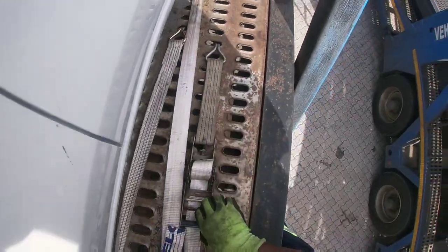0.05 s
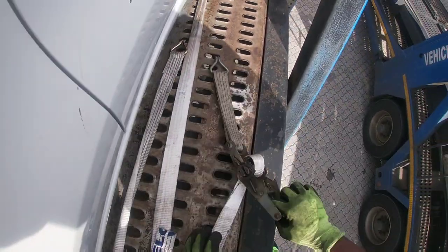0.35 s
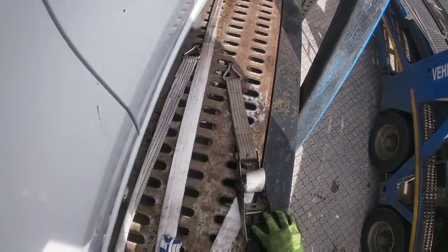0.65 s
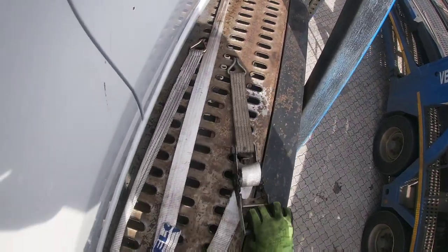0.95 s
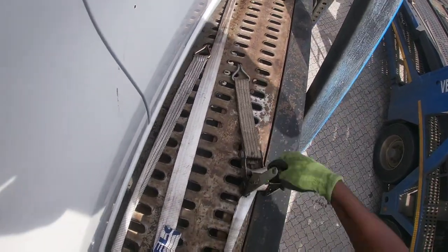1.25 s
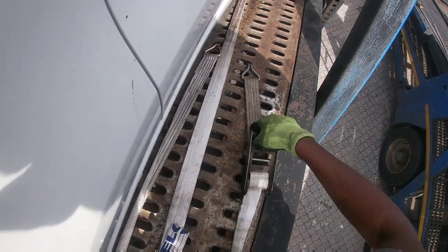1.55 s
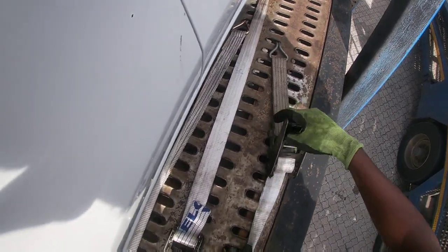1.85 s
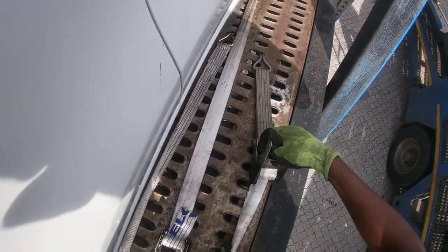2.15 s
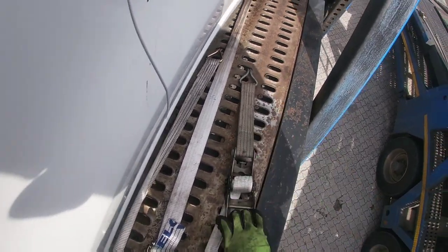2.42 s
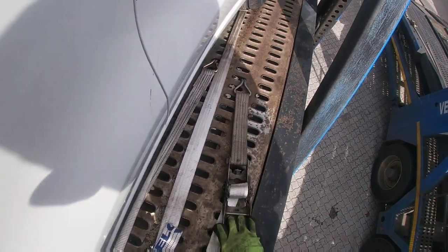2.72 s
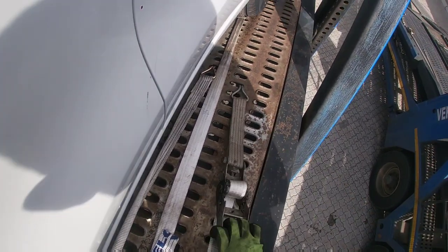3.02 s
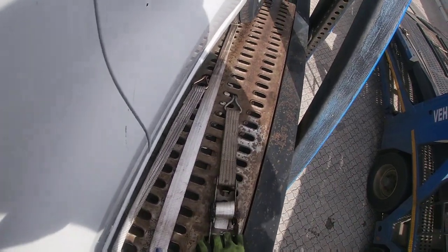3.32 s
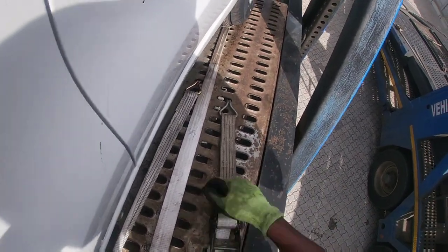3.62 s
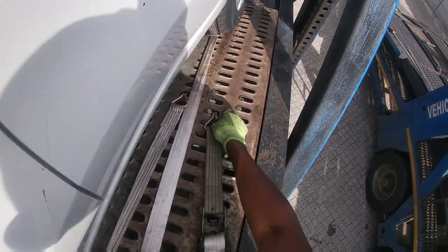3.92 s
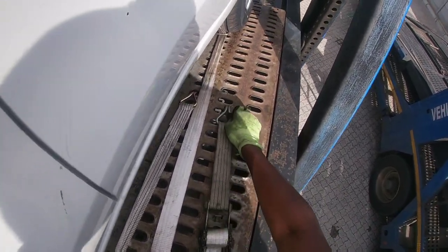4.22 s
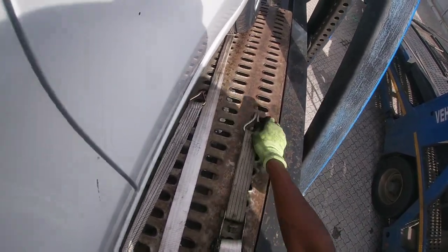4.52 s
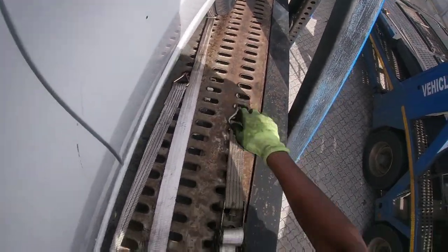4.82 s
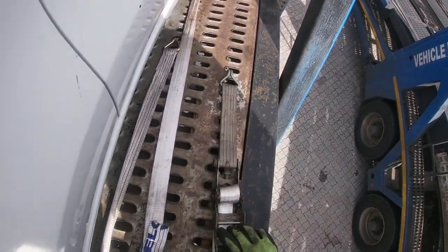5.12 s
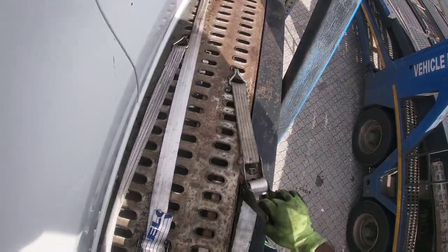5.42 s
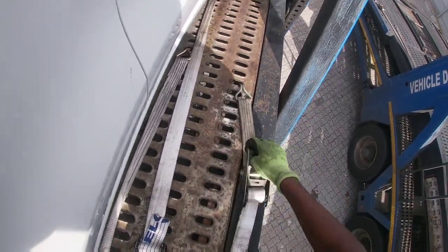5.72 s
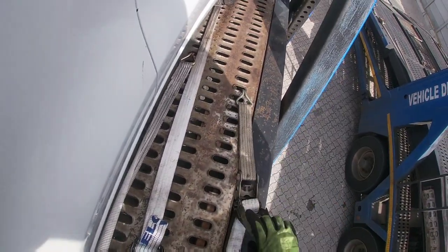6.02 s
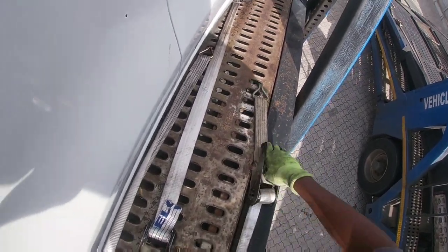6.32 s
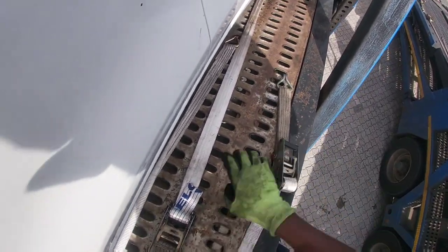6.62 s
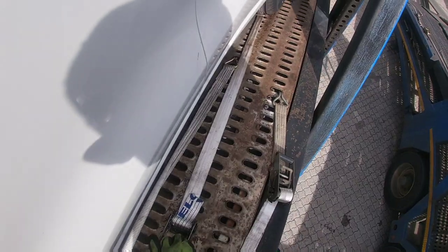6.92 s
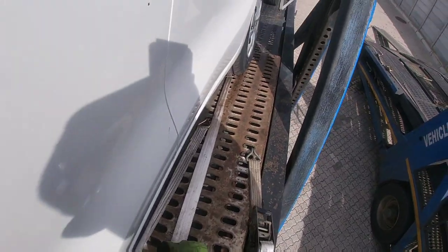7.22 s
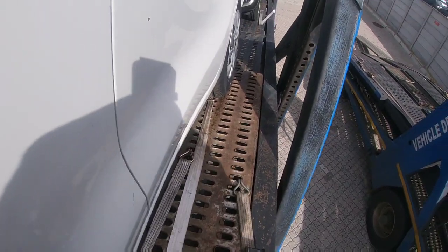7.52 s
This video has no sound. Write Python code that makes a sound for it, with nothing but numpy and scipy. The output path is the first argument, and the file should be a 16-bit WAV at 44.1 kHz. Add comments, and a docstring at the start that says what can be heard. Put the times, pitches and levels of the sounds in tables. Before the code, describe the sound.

A tie-down strap's hook and ratchet knock irregularly on a perforated steel trailer deck, making it clang and ring. Loose ratchet parts clink while the webbing rasps over the steel and faintly swishes against a glove. The knocks come in clusters throughout, with a few dull bumps on the microphone near the end. It is outdoors, heard at arm's length from a body-worn microphone with low rumble, gusts and a faint far engine fading early.

```python
"""A strap's hook and ratchet knock a trailer's perforated steel deck into ringing, outdoors.
A gloved hand drags the strap: loose ratchet parts clink, steel prongs ring, webbing rasps over
the deck and swishes on the glove. A body-worn mono camera hears it from arm's length, with
low rumble, dull bumps on its housing, wind, yard noise and a far engine slowing."""
import sys
import numpy as np
from scipy import signal
from scipy.fft import rfft, irfft
from scipy.io import wavfile
from scipy.ndimage import uniform_filter1d

SR = 44100
rng = np.random.default_rng(int(sys.argv[2]) if len(sys.argv) > 2 else 0)


def unload_wav(signal):
    """Save mono or channel-first audio to the path in sys.argv[1] as 16-bit WAV at rate SR, clipped to [-1, 1]."""
    wavfile.write(
        sys.argv[1],
        SR,
        np.round(np.clip(np.atleast_2d(signal).T, -1, 1) * 32767).astype(np.int16),
    )


N = 341775
T = np.arange(SR) / SR  # one second, the life of a blow
SCENE_T = np.arange(N) / SR
TOP_HZ = 15300

# hardware landing on the deck: start_s, clang_db, boom_db, hook_db, hook_hz, clang_t60_s
KNOCKS = [(0.022, -16.5, -48, -22.5, 2460, 0.073), (0.154, -16, -38, -24.5, 3140, 0.058),
          (0.328, -24.5, -37, -38, 5700, 0.43), (0.352, -17.5, -49, -24.5, 3400, 0.16),
          (0.366, -17, -35.5, -29, 2500, 0.22), (0.436, -22, -25.5, -33.5, 2750, .29),
          (0.483, -20, -27.5, -33.5, 4830, 0.26), (0.533, -26, -26.5, -36, 4810, 0.3),
          (0.614, -20.5, -27.5, -35, 2580, 0.12), (0.68, -17, -22, -24, 3070, 0.088),
          (0.999, -31, -43, -44, 3300, 0.61), (1.038, -20, -29, -24, 2720, 0.2),
          (1.08, -26, -29.5, -41, 2070, 0.86), (1.152, -27.5, -30, -40.5, 2300, 0.93),
          (1.221, -32.5, -30, -42, 4200, 0.6), (1.492, -35.5, -49, -41.5, 6160, 0.78),
          (1.538, -22.5, -43, -17.5, 4160, 0.2), (1.658, -13.5, -28.5, -19, 3030, 0.13),
          (1.698, -26.5, -25, -29.5, 3470, 0.27), (2.08, -25.5, -41.5, -41, 2390, 0.054),
          (2.393, -14.5, -27.5, -12.5, 2620, 0.081), (2.494, -16.5, -18.5, -22.5, 6160, 0.18),
          (2.522, -29, -25.5, -34, 2380, .57), (2.604, -26.5, -28, -38, 3440, .65),
          (2.676, -20.5, -39, -30, 5000, 0.36), (2.689, -24.5, -23, -37.5, 3360, 0.51),
          (2.888, -14.5, -17, -19, 3040, 0.18), (2.918, -27, -18.5, -26.5, 2120, 0.18),
          (3.461, -8.5, -17, -12, 2730, 0.073), (3.56, -24, -31.5, -43, 2500, .19),
          (3.646, -33.5, -44, -40.5, 3230, 0.69), (3.663, -24.5, -48, -31.5, 2780, 0.23),
          (4.026, -29.5, -47, -47, 2630, .14), (4.168, -19.5, -31, -22, 3280, 0.25),
          (4.299, -28, -26, -32.5, 4500, 0.36), (4.375, -30.5, -31, -42.5, 2520, 1),
          (4.426, -28.5, -35, -43, 4300, 0.57), (4.462, -21.5, -31, -20, 2640, 0.13),
          (4.614, -18, -42, -26.5, 2700, 0.31), (4.712, -15.5, -25, -18.5, 2650, 0.29),
          (4.784, -30, -24.5, -41, 2770, 0.5), (4.861, -21.5, -35, -38, 2230, 0.24),
          (5.343, -23, -32, -28.5, 2550, 0.29), (5.466, -28, -26, -39, 2650, 0.18),
          (5.521, -15.5, -55, -16, 4480, 0.16), (5.616, -17.5, -26, -21, 2730, .05),
          (5.641, -31, -26, -19.5, 2600, 0.22), (5.673, -16.5, -30, -20, 6000, 0.15),
          (5.738, -32, -32, -14.5, 2600, 0.025), (5.885, -21.5, -45, -21.5, 4120, 0.25),
          (5.931, -45, -27, -20, 4720, 0.51), (6.037, -22, -24.5, -13, 3010, 0.15),
          (6.503, -15.5, -29, -28, 2820, 0.11), (6.925, -25.5, -46, -21, 4620, 0.17),
          (7.158, -26, -40, -39, 2200, 0.098), (7.353, -35, -52, -40.5, 2270, 0.48),
          (7.447, -12, -18, -14, 4300, 0.11), (7.47, -19, -44, -18.5, 4300, 0.42)]
# spectra of deck, frame and hook: freq_hz, gain_db
CLANG_SPECTRUM = [(300, -51), (450, -14.5), (690, -11.5), (840, 3), (1000, 5), (1150, 0.5), (1320, -5.5),
                  (1900, -11.5), (2600, -18), (3500, -31.5), (6100, -59), (10000, -84)]
BOOM_SPECTRUM = [(80, -24.5), (135, -7), (200, 4), (300, 3.5), (450, -1), (640, 0), (850, -2), (1100, -37),
                 (1450, -38), (2600, -81.5)]
HOOK_SPECTRUM = [(800, -41.5), (1430, -8.5), (1900, -5.5), (2570, 1.5), (3460, 4.5), (4600, 0),
                 (6100, -4.5), (7900, -15), (10200, -24.5), (13500, -41), (14800, -45.5)]
# strong resonances of deck and hook: freq_hz, width_hz, gain_db
RESONANCES = [(597.6, 7.3, 7.5), (910, 64, -1.5), (902, 79, 0), (1089, 13.3, 5), (1161, 38, 2),
              (1525, 41, 2.5), (2320, 40, 4), (2500, 60, 2), (2798, 28, 5), (3190, 100, 3), (4210, 66, -4),
              (5060, 40, 7.5), (5480, 170, 6.5), (6100, 50, 11), (6430, 110, 4), (8200, 55, 2.5)]
# loose ratchet parts clicking: start_s, relative_db, centre_hz, crack_t60_s
CLINKS = [(0.37, -25, 4400, 0.18), (0.485, -22, 5540, 0.022), (0.534, -31.5, 4870, 0.08),
          (0.679, -35, 5300, 0.11), (1.222, -30.5, 4400.0, 0.02), (1.516, -30.5, 3260, 0.17),
          (1.538, -22.5, 5600, 0.045), (2.288, -28, 3100, 0.06), (2.301, -36, 3480, 0.012),
          (2.395, -26, 6600, 0.13), (2.4648, -14, 5700, 0.032), (2.494, -25, 5000, 0.013),
          (2.672, -21.5, 5730, 0.096), (2.887, -15, 4530, 0.0061), (3.022, -40, 6100.0, 0.091),
          (3.044, -27, 5850, 0.047), (3.078, -41, 5560, 0.012), (3.595, -39, 5960, 0.04),
          (4.714, -25, 5400, 0.035), (5.439, -44, 6700, 0.027), (5.655, -15.5, 5660, 0.014),
          (5.676, -29, 5500.0, 0.055), (5.738, -29.5, 6240, 0.03), (5.787, -11, 4630, 0.021),
          (5.791, -22.5, 6440, 0.059), (5.932, -20.5, 7650, 0.028), (6.037, -21.5, 4240, 0.12),
          (6.113, -21, 5500.0, 0.017), (6.119, -19.5, 5850, 0.044), (6.201, -44, 5500, .03),
          (6.25, -42, 5200, 0.062), (6.311, -37, 5100, 0.1), (6.326, -35, 4900.0, 0.045),
          (6.432, -34.5, 4330, 0.056), (6.529, -25.5, 4860, 0.025), (6.613, -38, 5370, 0.14),
          (6.925, -17.5, 4970, 0.045), (7.469, -30, 7200, 0.15)]
# ratchet modes: freq_hz, gain_db, free_t60_s
RATCHET_MODES = [(2690, -4.5, .07), (3020, -19, .1), (3390, -17, 0.098), (4220, -7, 0.14),
                 (4790, -4, 0.085), (5140, -5.5, 0.081), (5690, 6, 0.034), (6220, -6, .06),
                 (6500, -5.5, 0.31), (7320, -4, 0.062), (8030, -6, 0.08), (10300, -12, 0.08),
                 (10400, -5, .06), (12550, -7, 0.057)]
# spectrum of the ratchet's cracks: freq_hz, gain_db
CRACK_SPECTRUM = [(1000, 12.5), (7000, -4.5), (8200, -5.5), (13500, 3), (15000, -16.5)]
# hook or ratchet ringing freely: start_s, pitch_hz, level_db, t60_s
TINGS = [(1.039, 2970, -26.5, 0.19), (2.395, 7180, -25, 0.086), (2.467, 7100, -27, 0.12),
         (4.172, 3460, -21, 0.17), (5.645, 2800, -29, 0.17), (5.936, 4000, -26, 0.31),
         (5.937, 4790, -26, 0.4), (6.121, 7450, -43, 0.1), (6.53, 5700, -49, 0.57), (7.47, 7730, -45, 0.51)]
# strap dragged over the deck: start_s, length_s, level_db
DRAGS = [(0.0, 0.2, -40.5), (0.287, 0.15, -32), (0.588, 0.4, -44), (1.048, 0.092, -47),
         (1.305, 0.13, -38.5), (1.562, .24, -36), (1.865, 0.93, -51), (2.418, 0.058, -26),
         (2.513, 0.14, -33), (2.686, 0.27, -52), (2.934, 0.098, -32.5), (3.57, 0.074, -37.5),
         (3.925, 0.37, -47), (4.17, 0.32, -47), (4.682, 0.15, -24.5), (5.205, 0.22, -51),
         (5.311, 0.25, -34), (5.528, 0.21, -26.5), (5.93, 0.18, -25), (6.124, 0.14, -45.5),
         (6.404, 0.3, -40.5), (6.788, 0.3, -42), (7.196, 0.25, -40.5), (7.416, .15, -29),
         (7.587, 0.08, -35.5)]
# spectrum of webbing on steel: freq_hz, gain_db
RASP_SPECTRUM = [(200, -32.5), (450, 0.5), (640, -3), (900, 2), (1150, -1.5), (1450, -1), (1900, -3.5),
                 (2600, -6.5), (3500, -12), (6100, -25.5), (7900, -35), (10200, -43.5), (13000, -53.5),
                 (15000, -71)]
# glove sliding on webbing: start_s, length_s, level_db, centre_hz
SWISHES = [(0.785, 0.055, -62, 4660), (1.346, 0.14, -45, 3080), (2.015, 0.058, -70, 4200),
           (2.191, 0.033, -51, 3730), (3.9, 0.05, -60, 3170), (4.022, 0.053, -63.5, 6440),
           (5.032, 0.41, -69.5, 5100), (5.225, 0.16, -50.5, 3440), (6.344, 0.11, -53, 4750),
           (6.79, 0.26, -55, 4900), (7.013, 0.056, -46.5, 4000), (7.126, 0.079, -55.5, 5000),
           (7.234, 0.044, -61, 4800), (7.315, 0.12, -48.5, 3660)]
# low rumble as the camera picks it up: time_s, relative_db
RUMBLE_LEVELS = [(0.0, -52), (0.37, -57), (0.6, -39), (1.04, -31), (1.19, -29), (2.22, -34), (2.83, -32),
                 (3.21, -41), (3.52, -35), (4.68, -32), (4.98, -50), (5.27, -35), (5.68, -35.5),
                 (6.73, -32), (6.99, -26.5), (7.15, -76), (7.29, -45.5), (7.75, -32.5)]
# bumps on the camera housing: start_s, relative_db, pitch_hz, t60_s
BUMPS = [(2.887, -22.5, 200, .18), (5.298, -21, 84, 0.048), (6.792, -13.5, 177, 0.068),
         (6.808, -11, 128, 0.039), (6.881, -19, 73, 0.36), (6.936, -10, 201, 0.12), (6.953, -6, 151, 0.054),
         (6.994, -18.5, 121, 0.14), (7.029, -12, 138, 0.074), (7.09, -25.5, 140, 0.14),
         (7.15, -26, 118, 0.11)]
# gusts at the microphone: start_s, length_s, level_db
GUSTS = [(0.0, 0.36, -43.5), (0.56, 0.15, -43), (0.98, 2.1, -34), (2.36, 0.38, -31), (4.03, 0.21, -35),
         (4.31, 0.22, -26), (4.67, 0.23, -26), (4.92, 0.28, -45.5), (5.29, 0.21, -32), (6.22, 0.36, -36),
         (6.54, 0.45, -31), (6.86, 0.16, -18), (7.08, 0.18, -27), (7.45, 0.12, -24)]
# spectra of low rumble, wind, yard and engine hiss: freq_hz, gain_db
RUMBLE_SPECTRUM = [(35, -26), (80, -24), (135, -5.5), (200, 0.5), (300, -7), (640, -14), (1100, -23),
                   (1900, -34.5), (3500, -46), (8000, -88)]
WIND_SPECTRUM = [(12, -1.5), (30, 3), (80, 1), (135, -7), (200, -11.5), (300, -36), (640, -52),
                 (4000, -100)]
YARD_SPECTRUM = [(18, -8.5), (35, 0.5), (135, -4), (450, -14), (850, -17.5), (1400, -50), (2600, -50.5),
                 (6000, -46), (8000, -61), (13000, -66), (15000, -86)]
HISS_SPECTRUM = [(7000, -25), (8050, -1), (8500, -13.5), (9000, -5), (9600, -24), (14000, -34.5)]


def deck_knocks(hook_boost=2.4, hook_width_hz=110, dark_cutoff_hz=5500):
    """Each landing weights the same modes anew: the frame booms, the deck clangs, the hook rings."""
    out = np.zeros(N)
    hz, strength = plate_modes(count=1300, scatter_db=1.5)
    for start_s, clang_db, boom_db, hook_db, hook_hz, t60_s in KNOCKS:
        contact_s = 0.0015 * 0.26 / t60_s
        draws = rng.standard_normal((4, len(hz)))
        gains = strength * (draws[0] + 1j * draws[1])
        boom = ring(hz, gains * spectrum_gain(BOOM_SPECTRUM, hz))
        boom *= blow_envelope(2 * contact_s, 0.51 * t60_s, tail_db=-5.5, tail_t60_s=1.18)
        clang = ring(hz, gains * spectrum_gain(CLANG_SPECTRUM, hz))
        clang *= blow_envelope(2 * contact_s, t60_s, tail_db=-12, tail_t60_s=0.8)
        # the contact point favours groups of hook modes, one most
        spot_db = 2.8 * np.sqrt(12) * uniform_filter1d(draws[2], 12)
        peak = 1 + hook_boost / (1 + ((hz - hook_hz) / hook_width_hz) ** 2)
        hook_gains = gains * spectrum_gain(HOOK_SPECTRUM, hz) * undb(spot_db) * peak
        hook = ring(hz, hook_gains)
        hook *= blow_envelope(contact_s + 0.0006, 0.55 * t60_s, tail_db=-17.5, tail_t60_s=0.32)
        # a faint, darker, short ring of the hook's lower modes
        dark_ring = ring(hz, 1j * hook_gains / (1 + (hz / dark_cutoff_hz) ** 4))
        hook += undb(-33) * dark_ring * attack(0.0033) * decay(0.23)
        scuff = graze(ring(hz, -hook_gains))
        add(out, start_s - len(scuff) / SR, undb(hook_db) * scuff)
        add(out, start_s, undb(boom_db) * boom + undb(clang_db) * clang + undb(hook_db) * hook)
    return out


def plate_modes(count, scatter_db):
    """Crowded steel modes: whole-number frequencies and their strengths."""
    edges_hz = np.linspace(100, TOP_HZ, count + 1)
    hz = (edges_hz[:-1] + rng.random(count) * np.diff(edges_hz)).astype(int)
    return hz, resonance_gain(hz) * undb(scatter_db * rng.standard_normal(count))


def resonance_gain(hz):
    """Gain of the steel's strong resonances."""
    return undb(sum(gain_db / (1 + (2 * (hz - freq_hz) / width_hz) ** 2)
                    for freq_hz, width_hz, gain_db in RESONANCES))


def ring(hz, gains):
    """Modes sounding together for a second, rms 1 over the attack."""
    lines = np.zeros(SR // 2 + 1, complex)
    lines[hz] = gains
    return unit_rms(irfft(lines, SR), samples=1300)


def blow_envelope(contact_s, burst_t60_s, tail_db, tail_t60_s):
    """Energy leaves the struck spot quickly, then lingers in the whole trailer."""
    return attack(contact_s) * (decay(burst_t60_s) + undb(tail_db) * decay(tail_t60_s))


def graze(sound, level_db=-17, rise_s=0.0097):
    """Steel scuffs steel just before landing: a 23 ms swell."""
    return undb(level_db) * (sound * np.exp(-T / rise_s))[:1024][::-1]


def ratchet_clinks(width_octaves=0.69, modes_db=-5, scatter_db=5, detune=0.014, rise_s=0.0002):
    """A dry steel-on-steel crack, then the ratchet's modes, strongest near the struck part's pitch."""
    out = np.zeros(N)
    size = 8192
    t = T[:size]
    mode_hz, mode_db, free_t60_s = np.transpose(RATCHET_MODES)
    free_decays = np.exp(-np.log(1000) * np.outer(1 / free_t60_s, t))
    bins_hz = np.fft.rfftfreq(size, 1 / SR) + 1
    for start_s, relative_db, centre_hz, crack_t60_s in CLINKS + drag_rattles():
        level_draw, pitch_draw, phase_draw = rng.standard_normal((3, len(mode_hz)))
        focus = spectrum_gain(CRACK_SPECTRUM, bins_hz) * band_gain(bins_hz, centre_hz, width_octaves)
        gains = undb(mode_db + scatter_db * level_draw) * np.sqrt(np.interp(mode_hz, bins_hz, focus))
        pitches_hz = mode_hz * (1 + detune * pitch_draw)  # each part and grip rings differently
        phases = 2 * np.pi * np.outer(pitches_hz, t) + np.pi * phase_draw[:, None]
        modes = unit_rms(gains @ (np.sin(phases) * free_decays), samples=100)
        modes *= decay(5 * crack_t60_s)[:size]  # a tight grip shortens the ring
        crack = filtered(rng.standard_normal(size), focus * resonance_gain(bins_hz))
        crack *= decay(crack_t60_s)[:size]
        clink = (crack + undb(modes_db) * modes) * attack(rise_s)[:size]
        add(out, start_s, undb(relative_db - 1.5) * clink)
    return out


def drag_rattles(count=2, offset_db=-7, scatter_db=3, centre_hz=4500, crack_t60_s=0.0084):
    """Each drag jostles the ratchet into faint clicks; rows as in CLINKS."""
    return [(start_s + length_s * rng.random(),
             level_db + offset_db + scatter_db * rng.standard_normal(), centre_hz, crack_t60_s)
            for start_s, length_s, level_db in DRAGS for _ in range(count)]


def prong_tings(detune=0.013):
    """Two prongs of bent steel ring at nearly the same pitch and beat."""
    out = np.zeros(N)
    for start_s, pitch_hz, level_db, t60_s in TINGS:
        lower = np.sin(2 * np.pi * pitch_hz * T)
        upper = 0.87 * np.sin(2 * np.pi * (pitch_hz * (1 + detune) * T + rng.random()))
        add(out, start_s, undb(level_db) * (lower + upper) * attack(0.001) * decay(t60_s))
    return out


def strap_rasp(ticks_per_s=9000, surge_db=5.5):
    """Strap and hook catch and slip on rusty steel: surges of dense ticks ring the deck."""
    ticks = (rng.random(N) < ticks_per_s / SR) * rng.standard_normal(N)
    surges = ticks * undb(surge_db * wander(rate_hz=30))
    bins_hz = np.fft.rfftfreq(N, 1 / SR)
    rasp = filtered(surges, resonance_gain(bins_hz) * spectrum_gain(RASP_SPECTRUM, bins_hz))
    return rasp * swell(DRAGS, rise_s=0.022, release_s=0.055)


def glove_swishes(width_octaves=0.73):
    """Cloth on cloth: a hiss that starts quickly and eases as the hand slows."""
    out = np.zeros(N)
    bins_hz = np.arange(SR // 2 + 1) + 1
    for start_s, length_s, level_db, centre_hz in SWISHES:
        hiss = filtered(rng.standard_normal(SR), band_gain(bins_hz, centre_hz, width_octaves))
        add(out, start_s, undb(level_db) * hiss * attack(0.0039) * np.exp(-(T / length_s) ** 4))
    return out


def low_rumble():
    """Low rumble as the camera picks it up, swelling and at times ducking sharply."""
    level_db = np.interp(SCENE_T, *np.transpose(RUMBLE_LEVELS)) - 1.5
    return undb(level_db) * wavering_noise(RUMBLE_SPECTRUM, flutter_db=1.5, rate_hz=18)


def housing_bumps(thud_db=-9, cutoff_hz=300):
    """The housing is nudged: a low damped swing and a soft thud."""
    out = np.zeros(N)
    lowpass = signal.butter(3, cutoff_hz, fs=SR, output="sos")
    for start_s, relative_db, pitch_hz, t60_s in BUMPS:
        swing = np.sin(2 * np.pi * pitch_hz * T)
        thud = undb(thud_db) * unit_rms(signal.sosfilt(lowpass, rng.standard_normal(SR)))
        add(out, start_s, undb(relative_db + 5) * (swing + thud) * attack(0.0019) * decay(t60_s))
    return out


def wind(breeze_db=-45.5):
    """Gusts over a steady breeze buffet the microphone."""
    level = np.hypot(swell(GUSTS, rise_s=0.017, release_s=0.058), undb(breeze_db))
    return level * wavering_noise(WIND_SPECTRUM, flutter_db=1.5, rate_hz=13)


def yard(level_db=-45.5):
    """Low outdoor background noise."""
    return undb(level_db) * wavering_noise(YARD_SPECTRUM, flutter_db=1.2, rate_hz=3.4)


def far_engine(start_hz=73, idle_hz=41, settle_s=0.69, fade_s=3.4, hum_db=-43, hiss_db=-81):
    """A firing hum and its octave sink to idle beside a thin hiss; all fade away."""
    firing_hz = idle_hz + (start_hz - idle_hz) * np.exp(-SCENE_T / settle_s)
    firing_hz *= 1 + 0.035 * wander(rate_hz=12)
    phase = 2 * np.pi * np.cumsum(firing_hz) / SR
    hum = unit_rms(np.sin(phase) + undb(-9) * np.sin(2 * phase))
    hum *= undb(hum_db + 2 * wander(rate_hz=7.3))
    hiss = undb(hiss_db) * wavering_noise(HISS_SPECTRUM, flutter_db=2, rate_hz=3)
    return (hum + hiss) * np.exp(-(SCENE_T / fade_s) ** 4)


def undb(db):
    """Decibels to gain."""
    return 10 ** (np.asarray(db) / 20)


def unit_rms(x, samples=None):
    """Scale to rms 1, over the first samples if given."""
    return x / np.sqrt(np.mean(x[:samples] ** 2) + 1e-20)


def attack(rise_s):
    """Exponential rise to 1."""
    return 1 - np.exp(-T / rise_s)


def decay(t60_s):
    """Exponential decay."""
    return np.exp(-np.log(1000) * T / t60_s)


def swell(events, rise_s, release_s):
    """Envelope of events that rise, hold and die away, summed in power."""
    power = np.zeros(N)
    for start_s, length_s, level_db in events:
        rise = np.clip((SCENE_T - start_s) / rise_s, 0, 1)
        release = np.exp(-np.maximum(SCENE_T - start_s - length_s, 0) / release_s)
        power += (undb(level_db) * rise * release) ** 2
    return np.sqrt(power)


def spectrum_gain(spectrum, hz):
    """Gain of a spectrum table, interpolated in log frequency."""
    freq_hz, gain_db = np.transpose(spectrum)
    return undb(np.interp(np.log(hz + 1), np.log(freq_hz), gain_db))


def band_gain(hz, centre_hz, width_octaves):
    """Bell curve in log frequency."""
    return 1 / (1 + (np.log2(hz / centre_hz) / width_octaves) ** 2) ** 2


def filtered(x, gains):
    """Weight the FFT bins, then scale to rms 1."""
    return unit_rms(irfft(rfft(x) * gains, len(x)))


def wander(rate_hz):
    """Smooth random drift, spread about 0.7."""
    size = int(SR / rate_hz)
    steps = np.repeat(rng.standard_normal(N // size + 1), size)
    return 0.84 * uniform_filter1d(steps, size)[:N]


def wavering_noise(spectrum, flutter_db, rate_hz):
    """Shaped noise whose level wavers."""
    gains = spectrum_gain(spectrum, np.fft.rfftfreq(N, 1 / SR))
    return filtered(rng.standard_normal(N), gains) * undb(flutter_db * wander(rate_hz))


def add(track, start_s, sound):
    """Mix a sound in at start_s."""
    i = max(int(start_s * SR), 0)
    track[i:i + len(sound)] += sound[:N - i]


def scene():
    """All sources at one microphone, on two identical channels."""
    hardware = deck_knocks() + ratchet_clinks() + prong_tings()
    strap = strap_rasp() + glove_swishes()
    mix = hardware + strap + low_rumble() + wind() + housing_bumps() + yard() + far_engine()
    return np.tile(mix, (2, 1))


def record(dry):
    """The camera rounds the highest peaks and cuts the top."""
    lowpass = signal.ellip(10, 0.2, 80, TOP_HZ, fs=SR, output="sos")
    return signal.sosfilt(lowpass, np.tanh(dry))


dry = scene()
out = record(dry)
unload_wav(out)
```